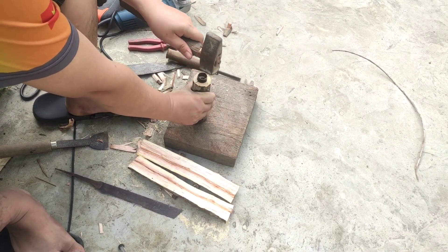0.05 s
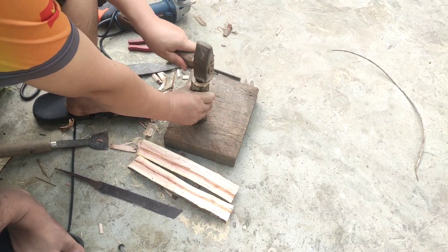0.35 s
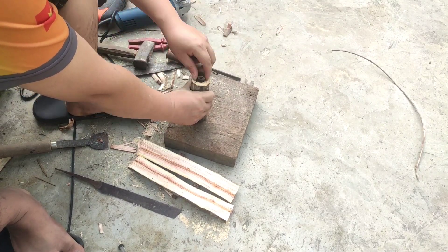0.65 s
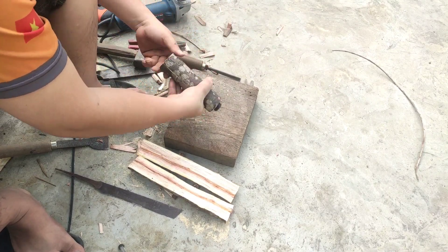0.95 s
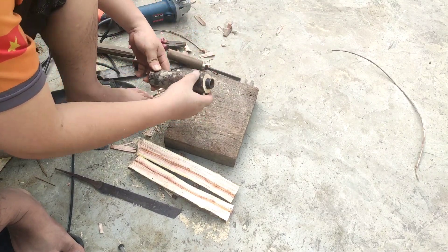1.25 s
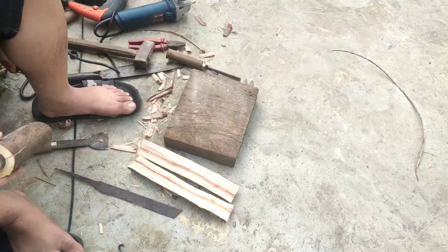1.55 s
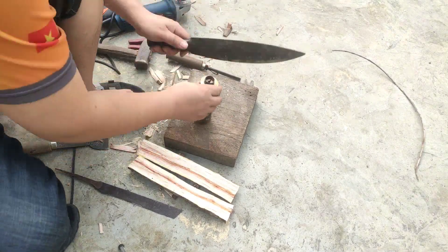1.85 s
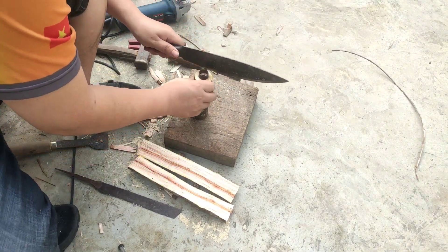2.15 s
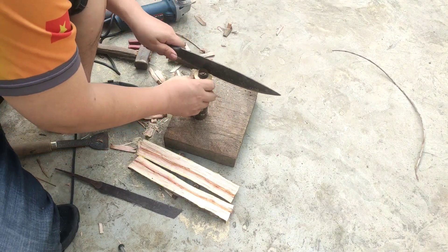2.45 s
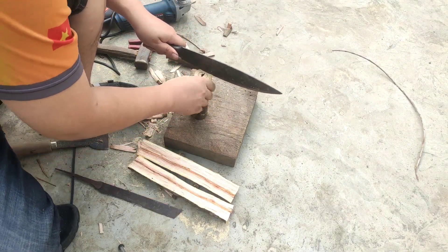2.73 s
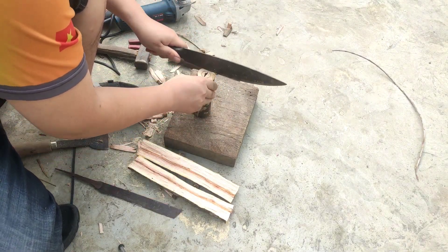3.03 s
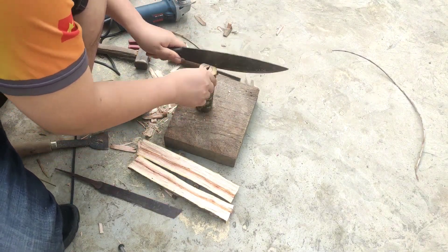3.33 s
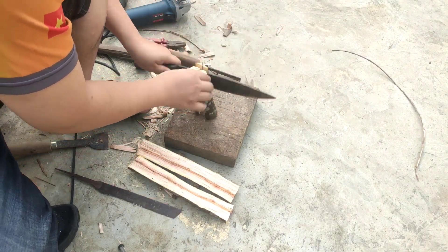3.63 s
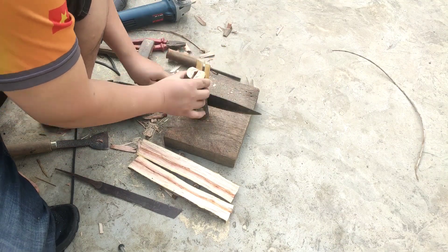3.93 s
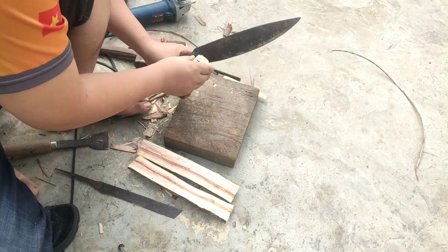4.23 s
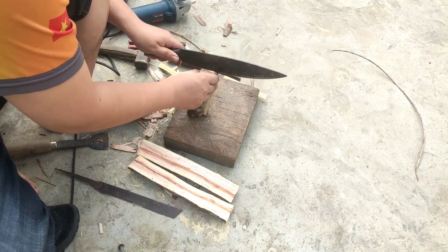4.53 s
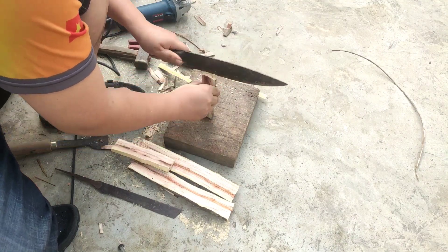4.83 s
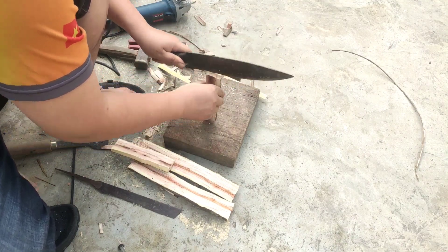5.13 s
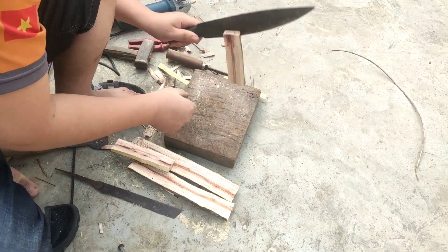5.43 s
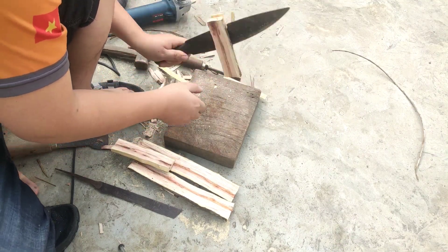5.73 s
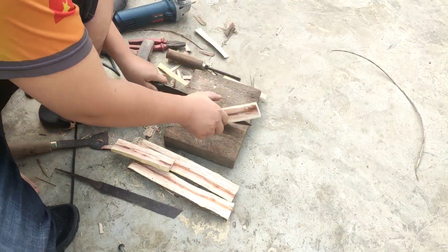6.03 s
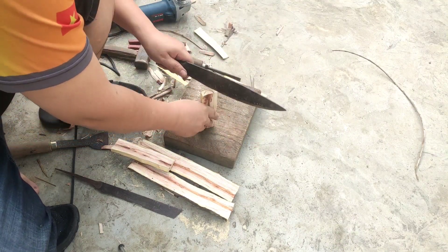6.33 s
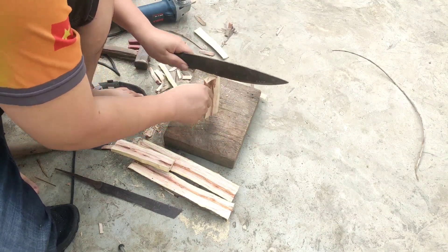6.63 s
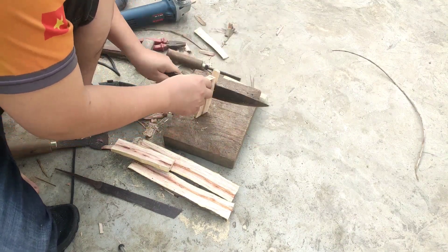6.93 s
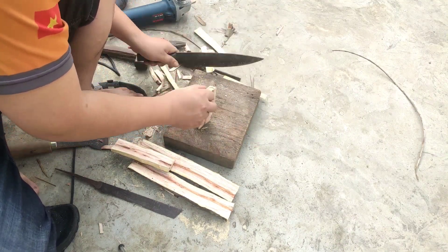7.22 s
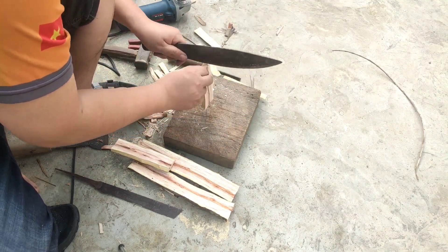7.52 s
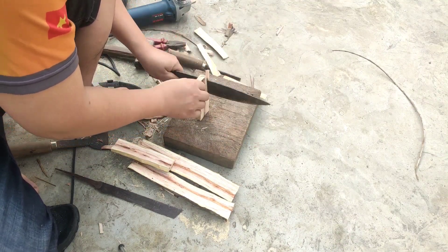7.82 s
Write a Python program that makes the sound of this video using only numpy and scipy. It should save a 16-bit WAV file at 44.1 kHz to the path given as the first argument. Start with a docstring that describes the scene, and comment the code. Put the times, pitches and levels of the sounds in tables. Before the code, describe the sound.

At about 0.4 seconds a hammer strikes a small log on a wooden block with one loud, hollow knock, cut short. From here the work sounds sped up, high and dry. The hammer clatters onto concrete around 0.6 seconds. A sharp clack comes at 1.7 seconds, then light taps and a single knife chop just after 2 seconds.

A large knife then splits the wood in four rapid runs, about fourteen chops a second, each a bright click of cracking fibres with a brief woody ring. The runs last from about 2.9 to 4 seconds, 4.7 to 6, 6.5 to 7.2, and 7.5 to 7.9. Between them the blade taps the block softly and split sticks drop on the floor.

The work sounds close, with only a short room echo. Very faint grit ticks, shuffling and steady workshop air lie underneath.

```python
"""A workshop: a hammer knocks a billet on a wooden block, then the work runs in fast motion.
The hammer clatters down and a big knife splits the billet in four quick runs of chops.
Fast motion lifts the wood's knock nearly three octaves and shrinks the room: each chop is a dry,
bright click of cracking fibres and ringing wood. Sticks drop on concrete and grit ticks,
over faint squeaks, shuffling and steady shop air."""
import sys
import numpy as np
from scipy import signal
from scipy.fft import rfft, irfft, next_fast_len
from scipy.io import wavfile
from scipy.ndimage import uniform_filter1d, minimum_filter1d

SR = 44100
rng = np.random.default_rng(int(sys.argv[2]) if len(sys.argv) > 2 else 0)


def dump(signal):
    """Clip the signal to [-1, 1] and save it as 16-bit WAV at the path in sys.argv[1]."""
    limited = np.clip(np.atleast_2d(signal).T, -1, 1)
    pcm = np.round(limited * 32767).astype(np.int16)
    wavfile.write(sys.argv[1], SR, pcm)


N = 351477
FAST_FROM_S = .404


def amp(db):
    """Decibels to gain."""
    return 10 ** (np.asarray(db) / 20)


def unit_rms(x):
    """Scale to rms 1."""
    return x / np.sqrt(np.mean(x ** 2) + 1e-20)


def unit_energy(x):
    """Scale each channel to energy 1."""
    return x / np.sqrt(np.sum(x ** 2, axis=-1, keepdims=True) + 1e-20)


def clock(size):
    """Sample times in s."""
    return np.arange(size) / SR


def add(track, start_s, sound):
    """Mix a sound in at start_s."""
    part = track[:, round(start_s * SR):][:, :sound.shape[-1]]
    part += sound[..., :part.shape[1]]


def along(points, hz):
    """Interpolate (f/Hz, value) points on a log axis."""
    freqs, values = np.transpose(points)
    return np.interp(np.log(hz + 1), np.log(freqs + 1), values)


def colour(x, spectrum, tilt_db=0):
    """Minimum-phase filter; tilt_db per octave above SR / 20."""
    size = 2 * next_fast_len(x.shape[-1])
    hz = np.fft.rfftfreq(size, 1 / SR)
    level_db = along(spectrum, hz) + tilt_db * np.log2(np.maximum(hz, SR / 20) / SR)
    cepstrum = irfft(np.log(amp(level_db)))
    cepstrum[1:size // 2] *= 2
    cepstrum[size // 2 + 1:] = 0
    return irfft(rfft(x, size) * np.exp(rfft(cepstrum)))[..., :x.shape[-1]]


def stereo_noise(size, side_db):
    """White noise, side at side_db re mid."""
    mid, side = rng.standard_normal((2, size))
    return np.array([mid + amp(side_db) * side, mid - amp(side_db) * side])


def wash(spectrum, side_db):
    """Steady coloured noise, rms 1."""
    return unit_rms(colour(stereo_noise(N, side_db), spectrum))


def fade(t, t60_s, attack_s):
    """Quick rise, exponential decay."""
    return amp(-60 * t / t60_s) * (1 - np.exp(-(t / attack_s) ** 2))


def burst(t, spectrum, t60_s, attack_s, side_db, tilt_db=0):
    """Decaying coloured noise, energy 1."""
    noise = stereo_noise(len(t), side_db) * fade(t, t60_s, attack_s)
    return unit_energy(colour(noise, spectrum, tilt_db))


def ring(t, modes, attack_s, scatter_db=0, detune=.008):
    """Damped modes, energy 1; each blow lands on a new spot and shifts them a little."""
    out = np.zeros(len(t))
    for k, (hz, db, t60_s) in enumerate(modes):
        level_draw, pitch_draw = rng.standard_normal(2)
        tone = np.sin(2 * np.pi * hz * (1 + detune * pitch_draw) * t)
        out += (-1) ** k * amp(db + scatter_db * level_draw) * tone * fade(t, t60_s, attack_s)
    return unit_energy(out)


# Billet in fast motion, low to high: f/Hz, relative level/dB, t60/s
BODY_MODES = [(970, -12, 0.0054), (1390, -8, 0.018), (2164, -0.5, 0.0094), (2677, -4, 0.01),
              (3380, 9.5, 0.0054), (3890, -5.5, 0.013)]
MID_MODES = [(4521, 0.5, 0.0057), (5218, 3.5, 0.006), (5895, -9.5, .005)]
TOP_MODES = [(9670, -6, 0.008), (10275, -19, 0.012)]


def wood_rings(t, lowest_mid_db):
    """The billet's three mode groups; where the blade lands sets the lowest mid mode's level."""
    (hz, db, t60_s), *upper_modes = MID_MODES
    body = ring(t, BODY_MODES, attack_s=.00055, scatter_db=2.5)
    mid = ring(t, [(hz, db + lowest_mid_db, t60_s), *upper_modes], attack_s=.00017, scatter_db=3)
    top = ring(t, TOP_MODES, attack_s=.00028, scatter_db=3)
    return body, mid, top


# Tearing fibres: f/Hz, relative level/dB
CRACK_SPECTRUM = [(40, -47), (600, -41.5), (1800, -33.5), (3000, -19.5), (4200, 1.5), (6500, 0),
                  (8500, -0.5), (10500, -7), (14000, -25)]
SPLINTER_SPECTRUM = [(3000, -50), (8000, -25.5), (10500, 4.5), (11500, 8.5), (12300, 7.5), (13400, -4.5),
                     (15000, -0.5), (15700, -16.5), (17000, -32.5)]


def fibres(t, opening):
    """Fibres crack and splinter; the crack thins as the split opens."""
    crack = burst(t, CRACK_SPECTRUM, t60_s=.0024, attack_s=.00015, side_db=-16.5, tilt_db=.83 * opening)
    splinter = burst(t, SPLINTER_SPECTRUM, t60_s=.0036, attack_s=.00005, side_db=-14)
    return crack, splinter


# Runs of chops: t/s, split onset/s, opening time/s, final opening/0-1, thud re chop/dB
SPLIT_RUNS = [(2.0, 2.921, .4, 0.54, -42.5), (4.5, 5.164, .28, 1, -45), (6.4, 6.618, 0.12, 0.96, -45),
              (7.4, 7.51, 0.11, 0.76, -45.5)]


def split(at_s):
    """Opening and thud level: shut as a run begins, the split widens as the blade sinks."""
    _, onset_s, span_s, final, thud_db = [run for run in SPLIT_RUNS if run[0] <= at_s][-1]
    return final * np.clip((at_s - onset_s) / span_s, 0, 1), thud_db


# Knife strokes: t/s, level/dB, brightness/dB, lowest mid mode offset/dB
CHOPS = [(2.0651, 0, 5.5, -4.0), (2.898, 2.5, -18, 6), (2.9682, 4.5, -7, 1), (3.0385, 1, -2.5, -16),
         (3.1116, 3, -9, -1), (3.1882, 3, -6, -2.5), (3.265, 6, -12, -6), (3.3497, 6, -4.5, -6.5),
         (3.4215, 6, -3.5, 2.5), (3.5013, 5.5, -7.0, -10), (3.5783, 6.5, -3.0, -16.5),
         (3.6601, 3.5, -3, -8), (3.7421, 4.5, -9, -18), (3.8127, 6, -5, -6), (3.8851, 4, -2, 22.5),
         (3.9549, 6, -9, -1.5), (4.027, 7.0, -10.5, -0.5), (4.5599, -9.5, -29, -10),
         (4.7642, -4.5, -8, -14), (4.8337, 3, -5.5, -5.5), (4.9046, 5, -7, -1), (4.9769, 2.5, -6.5, -3),
         (5.048, 2.5, -4.5, 0.5), (5.1217, 5.5, -3, -7), (5.1945, 7, -6, -12.5), (5.269, 1.0, 0, -14),
         (5.3417, 4, -6, -3.5), (5.4144, 1.5, -3.5, 4.5), (5.4875, 1, -1.5, -9.5),
         (5.5596, 2.5, -6.5, -0.5), (5.6333, 3.5, -3.0, -11.5), (5.7039, 0.5, -4, -3), (5.7734, 2, -5, -5),
         (5.8416, 1.5, -5.5, -5.5), (5.9175, 4, -6, 0.5), (6.001, 6.5, -11.5, 0.5),
         (6.0045, 5.5, -15.5, -0.5), (6.471, -1.5, -26.5, -5), (6.5368, -2, 3, -20.5), (6.6075, 3, 0, -5),
         (6.6902, -0.5, -2, -8.5), (6.7664, 2.5, -6, 3.5), (6.837, 0.5, -1.5, -9), (6.9154, 3.5, 5.5, -2),
         (6.994, 0.5, -0.5, -5.5), (7.0694, 3, -6.0, -3), (7.1463, 5, -8.5, -2), (7.494, -3.5, -9, -8),
         (7.555, -2.0, -3, -10.0), (7.6186, 0, -0.5, -0.5), (7.6857, 0.5, -1.5, -18), (7.756, 1.5, 3, 0),
         (7.8297, 0.5, 1.5, 6), (7.902, 2.0, -1, -12)]
# Push into the block: f/Hz, relative level/dB
THUD_SPECTRUM = [(30, -5.5), (250, 0), (600, 0.5), (1200, -14), (3000, -48.5)]
# Part gains: level re chop/dB, slope/(dB per dB of brightness), change at full opening/dB
BODY_LAW, MID_LAW, TOP_LAW = (-8.5, .17, -14), (-.62, 0, 0), (1.9, 1.31, 0)
CRACK_LAW, SPLINTER_LAW = (.94, .49, .53), (-.5, .93, .91)
NEAR_LAW, ROOM_LAW = (-18.5, .24, 0), (-25, .3, 3.7)


def chops():
    """The blade bites: fibres tear, the billet rings briefly, the block hums on, the shop answers."""
    out, t = np.zeros((2, N)), clock(8192)
    push = unit_energy(colour(1.0 * (t == 0), THUD_SPECTRUM))
    for start_s, db, bright_db, lowest_mid_db in CHOPS:
        opening, thud_db = split(start_s)
        gain = lambda law: amp(db + np.dot(law, [1, bright_db, opening]))
        thud = amp(db + thud_db + 2 * rng.standard_normal()) * push
        body, mid, top = wood_rings(t, lowest_mid_db)
        body, mid, top = gain(BODY_LAW) * body, gain(MID_LAW) * mid, gain(TOP_LAW) * top
        crack, splinter = fibres(t, opening)
        tear = gain(CRACK_LAW) * crack + gain(SPLINTER_LAW) * splinter
        block = amp(-26.5) * ring(t, [(832, 0, .18)], attack_s=.004)
        near, far = shop_response(t, ringing=mid + top / 2, click=mid + tear)
        tail = gain(NEAR_LAW) * near + gain(ROOM_LAW) * (block + far)
        add(out, start_s, thud + body + mid + top + tear + tail)
    return out


# Shop in fast motion: f/Hz, relative level/dB
ROOM_SPECTRUM = [(100, -19), (600, -17.5), (820, -12), (1000, -7), (1300, -6.5), (2000, -4.5), (3500, 2),
                 (4900, 6.5), (6500, 0.5), (8500, -1), (9900, 2.5), (12000, 6.5), (15300, -3.5),
                 (16300, -25)]


def shop_response(t, ringing, click):
    """Near scatter and far sound: diffuse noise, the wood's lingering ring, wall echoes."""
    near = burst(t, ROOM_SPECTRUM, t60_s=.016, attack_s=.0042, side_db=-10)
    diffuse = burst(t, ROOM_SPECTRUM, t60_s=.12, attack_s=.0017, side_db=-5.5)
    reverb = stereo_noise(len(t), side_db=13) * fade(t, t60_s=.11, attack_s=.003)
    lingering = unit_energy(signal.fftconvolve(np.atleast_2d(ringing), reverb, axes=1)[:, :len(t)])
    return near, amp(-1) * (diffuse + lingering) + amp(-3.5) * wall_echoes(t, click)


def wall_echoes(t, sound, first_s=.012, span_s=.01, count=5):
    """Nearby walls return a few separate copies, energy 1 in all."""
    reflections = np.zeros((2, len(t)))
    for lag, left, right in rng.random((count, 3)):
        add(reflections, first_s + lag * span_s, (1 - lag / 2) * np.array([[left], [right]]))
    return unit_energy(signal.fftconvolve(sound, reflections, axes=1)[:, :len(t)])


# Blow and rebound: t/s, level/dB, crack re knock/dB
HAMMER_BLOWS = [(0.385, 14.5, -15.5), (0.398, -3, -8.5)]
# Billet at natural speed: f/Hz, relative level/dB, t60/s
BILLET_MODES = [(215, -31, 0.036), (455, -11, 0.017), (648, -2.5, 0.026), (793, 4.5, 0.023),
                (1500, -2.5, 0.028), (1593, -18.5, .036), (2520, -17.5, 0.042), (3608, -7, 0.012)]
# Shop's answer, in fast motion: t/s, level/dB, t60/s
HAMMER_ECHOES = [(0.4035, -16.5, .05), (0.4163, -14, .065)]


def hammer(cutoff_t60_s=.0028):
    """A hollow knock and a weak rebound, cut short as fast motion begins; the shop answers."""
    out, t = np.zeros((2, N)), clock(4096)
    for start_s, db, crack_db in HAMMER_BLOWS:
        knock = ring(t, BILLET_MODES, attack_s=.0011)
        knock = np.array([knock, np.roll(knock, 2)])  # left leads
        crack = burst(t, CONCRETE_SPECTRUM, t60_s=.033, attack_s=.0005, side_db=-8, tilt_db=-8.5)
        cutoff = amp(-60 * np.maximum(start_s + t - FAST_FROM_S, 0) / cutoff_t60_s)
        add(out, start_s, amp(db) * cutoff * (knock + amp(crack_db) * crack))
    for start_s, db, t60_s in HAMMER_ECHOES:
        add(out, start_s, amp(db) * burst(t, ROOM_SPECTRUM, t60_s, attack_s=.0015, side_db=0, tilt_db=-5))
    return out


# Blade and billet touching the block, and small fibre snaps: t/s, relative level/dB, brightness/dB
TAPS = [(1.8782, -25.5, -23), (1.986, -26.5, -12), (2.119, -30.5, -13.5), (2.217, -32, -19),
        (2.2781, -26, -14), (4.038, -21, -8), (4.074, -26, -7.5), (4.3247, -29.5, -34), (6.026, -32.5, 1),
        (6.0728, -18, -7.5), (6.091, -31.5, -13), (6.2027, -28.5, -10), (7.1914, -30, 7),
        (7.2906, -30, -13)]


def taps(hand_t60_s=.008):
    """Light touches and small fibre snaps wake the same wood modes, quickly damped."""
    out, t = np.zeros((2, N)), clock(2048)
    for start_s, db, bright_db in TAPS:
        mid = ring(t, MID_MODES, attack_s=.0002, scatter_db=3)
        body = amp(-10.5) * ring(t, BODY_MODES, attack_s=.00035, scatter_db=6.5)
        wood = unit_energy(amp(-60 * t / hand_t60_s) * (mid + body))
        top = amp(1.5) * ring(t, TOP_MODES, attack_s=.000314, scatter_db=12)
        splinter = amp(-6.5) * burst(t, SPLINTER_SPECTRUM, t60_s=.0033, attack_s=.00011, side_db=-9)
        crack = amp(-12) * burst(t, CRACK_SPECTRUM, t60_s=.0059, attack_s=.00026, side_db=3)
        room = amp(-18) * burst(t, ROOM_SPECTRUM, t60_s=.07, attack_s=.002, side_db=2.5)
        add(out, start_s, amp(db + 5) * (wood + amp(bright_db) * (top + splinter) + crack + room))
    return out


# Tools and sticks landing: t/s, level/dB, t60/s, tilt/(dB per octave)
LANDINGS = [(.5386, -15, .026, 8), (.5602, -23, .025, -11.5), (.576, -8, .02, 1), (.5905, -13.5, .035, 1.5),
            (1.516, -29.5, .0085, 9), (1.543, -23.5, .008, 8.5), (1.645, -31, .18, 2.5),
            (1.7349, -8, 0.0226, 1), (1.9646, -31, .012, 11.5), (2.6944, -26, .013, 8),
            (2.758, -28, .018, 6.5), (4.053, -17.5, .013, 8.5), (4.077, -16.5, .055, 5.5),
            (4.184, -31.5, .018, 13), (4.6646, -27, .015, 1.5), (6.082, -23.5, .035, 4),
            (7.222, -26.5, .071, 7.5)]
# Impact on concrete: f/Hz, relative level/dB
CONCRETE_SPECTRUM = [(200, -27.5), (900, -25), (1600, 0), (3000, 1.5), (5000, 1.5), (7000, -1), (9200, 1.5),
                     (15300, -8.5), (16600, -27.5)]


def clatter(rattle_db=4, settle_db=-10):
    """The hammer and split sticks drop, slide and settle, chattering on the rough floor."""
    out, t = np.zeros((2, N)), clock(4096)
    for start_s, db, t60_s, tilt_db in LANDINGS:
        chatter = amp(rattle_db * unit_rms(uniform_filter1d(rng.standard_normal(len(t)), size=60)))
        scuff = burst(t, CONCRETE_SPECTRUM, t60_s, attack_s=t60_s / 40, side_db=-10, tilt_db=tilt_db)
        settle = burst(t, CONCRETE_SPECTRUM, t60_s=.09, attack_s=.004, side_db=3, tilt_db=tilt_db)
        add(out, start_s, amp(db) * unit_energy(chatter * (scuff + amp(settle_db) * settle)))
    return out


def grit(count=45):
    """Chips and grit tick under hands and feet."""
    out, t = np.zeros((2, N)), clock(1024)
    for when, size in rng.random((count, 2)):
        tick = burst(t, CONCRETE_SPECTRUM, t60_s=.012, attack_s=.00052, side_db=5.5)
        add(out, FAST_FROM_S + when * (N / SR - FAST_FROM_S), amp(-52 + 9 * size) * tick)
    return out


# Echo bands: f/Hz, relative level/dB
ECHO_LOW_SPECTRUM = [(59, -45.5), (100, -16), (123, -9.5), (150, -14.5), (183, -9), (275, -16.5),
                     (433, -8.5), (802, -2), (1150, -25.5), (1220, -17.5), (1490, -7.5), (1620, -20),
                     (1900, -20), (2470, -50.5), (4180, -120)]
ECHO_HIGH_SPECTRUM = [(1060, -36.5), (1800, -11.5), (2770, -3.5), (3770, -5.5), (4200, -10.5), (7610, -24),
                      (10000, -45), (13000, -80.5), (22000, -120)]
# Quick and slow decay per band: initial level/dB, t60/s
ECHO_LOW_DECAYS = [(-48, 0.23), (-52.5, 1.0)]
ECHO_HIGH_DECAYS = [(-54, .2), (-55, .8)]


def dying_echo():
    """The shop still rings from an earlier blow."""
    t = clock(N)
    decay = lambda rows: sum(amp(db - 60 * t / t60_s) for db, t60_s in rows)
    low = decay(ECHO_LOW_DECAYS) * wash(ECHO_LOW_SPECTRUM, side_db=-1.5)
    high = decay(ECHO_HIGH_DECAYS) * wash(ECHO_HIGH_SPECTRUM, side_db=1)
    return low + high


# Squeaks: t/s, length/s, start f/Hz, end f/Hz, level/dB
SQUEAKS = [(0.06, 0.11, 4800, 3620, -68), (4.284, 0.038, 3410, 3500, -63)]


def squeaks():
    """Short, thin glides."""
    out = np.zeros((2, N))
    for start_s, length_s, start_hz, end_hz, db in SQUEAKS:
        hz = np.linspace(start_hz, end_hz, round(length_s * SR))
        add(out, start_s, amp(db) * np.hanning(len(hz)) * np.sin(2 * np.pi * np.cumsum(hz) / SR))
    return out


# Shop air: f/Hz, relative level/dB
RUMBLE_SPECTRUM = [(12, -43.5), (20, -9), (129, -3), (268, -8.5), (387, -6), (447, -16.5), (484, -6.5),
                   (532, -19), (585, -15.5), (900, -15), (1170, -45.5), (1980, -120)]
HISS_SPECTRUM = [(350, -40.5), (600, -11.5), (803, -9.5), (922, -10), (1140, -9.5), (1230, -6), (1580, -3),
                 (1870, -6.5), (2570, -3.5), (3000, -4), (6520, -9.5), (10300, -12.5), (14000, -12),
                 (15600, -16), (16500, -36.5)]


def air(natural_speed):
    """Steady rumble and hiss; the hiss is quieter before the fast motion."""
    rumble = amp(-80) * wash(RUMBLE_SPECTRUM, side_db=-7.5)
    hiss = amp(-68.5 - 7 * natural_speed) * wash(HISS_SPECTRUM, side_db=-4.5)
    return rumble + hiss


def swells(rows):
    """Gaussian gain humps, summed in power."""
    t = clock(N)
    power = sum(amp(db) ** 2 * np.exp(-2 * ((t - mid_s) / half_s) ** 2) for mid_s, half_s, db in rows)
    return np.sqrt(power)


# Worker's movements: centre t/s, half length/s, level/dB
SHUFFLES = [(.25, 0.14, -70), (1.1, 0.28, -72), (2.0, 0.95, -78.5)]


def shuffling():
    """Low rustle as the worker shifts about."""
    return swells(SHUFFLES) * wash(RUMBLE_SPECTRUM, side_db=-7)


# Hum swells: centre t/s, half length/s, level/dB
HUM_SWELLS = [(5.5, 2.1, -86), (6.72, 0.23, -76)]


def hum():
    """A faint noise band at 290 Hz swells and fades."""
    band = [(230, -44), (278, -13), (290, 3.5), (302, -19), (360, -50)]
    return swells(HUM_SWELLS) * wash(band, side_db=-16)


# Steady tones: f/Hz, level/dB
WHINE_TONES = [(1160, -86), (1620, -85), (3020, -87)]


def whine(relative_width=.012):
    """Narrow noise bands hang in the air."""
    skirt = [(-6, -60), (-1, -9), (0, 0), (1, -9), (6, -60)]  # offset/widths, level/dB
    band = lambda hz: [(hz * (1 + offset * relative_width), db) for offset, db in skirt]
    return sum(amp(db) * unit_rms(wash(band(hz), side_db=-16)) for hz, db in WHINE_TONES)


def scene():
    """The work and the shop around it."""
    natural_speed = np.interp(clock(N), [FAST_FROM_S - .04, FAST_FROM_S], [1, 0])
    work = hammer() + chops() + taps() + clatter() + grit()
    shop = natural_speed * dying_echo() + squeaks() + air(natural_speed) + shuffling() + hum() + whine()
    return work + shop


# Microphone port balance: f/Hz, left minus right/dB
PORT_BALANCE = [(700, 0.048), (2400, .2), (4600, -1.2), (8100, 0), (10000, 0.93), (15000, -1.2)]
# Microphone port phase: f/Hz, left lead/rad
PORT_PHASE = [(800, -0.69), (1700, 0.11), (4800, -.28), (7000, -0.45), (9500, -0.56), (12000, -1.3),
              (15000, -0.67)]


def record(dry):
    """Two slightly unequal microphone ports, a fast peak limiter, a steep low-pass."""
    ceiling, top_hz = .92, 16600
    size = next_fast_len(N + SR // 2)
    hz = np.fft.rfftfreq(size, 1 / SR)
    side = np.array([[.5], [-.5]])
    ports = amp(side * along(PORT_BALANCE, hz)) * np.exp(1j * side * along(PORT_PHASE, hz))
    heard = irfft(rfft(dry, size) * ports, size)[:, :N]
    needed_gain = 1 / np.maximum(1, np.abs(heard).max(axis=0) / ceiling)
    gain = uniform_filter1d(minimum_filter1d(needed_gain, size=33), size=33)
    low_pass = 1 / np.sqrt(1 + (hz / top_hz) ** 200)
    return irfft(rfft(heard * gain, size) * low_pass, size)[:, :N]


dry = scene()
out = record(dry)
dump(out)
```